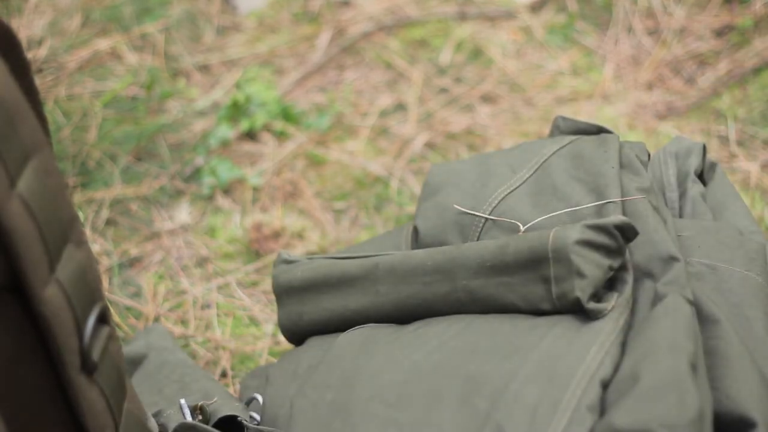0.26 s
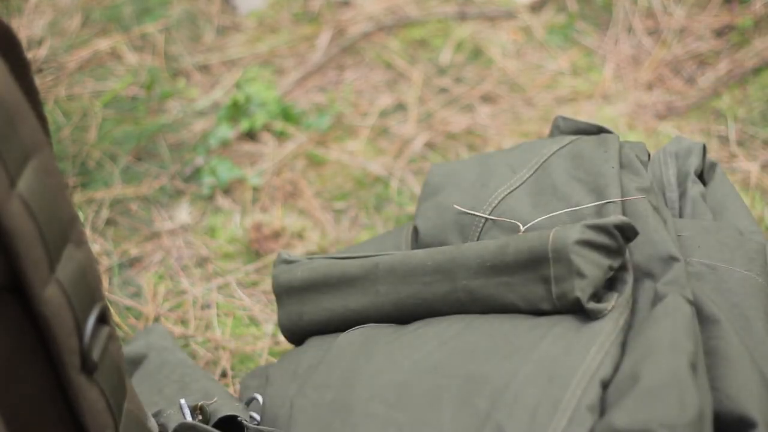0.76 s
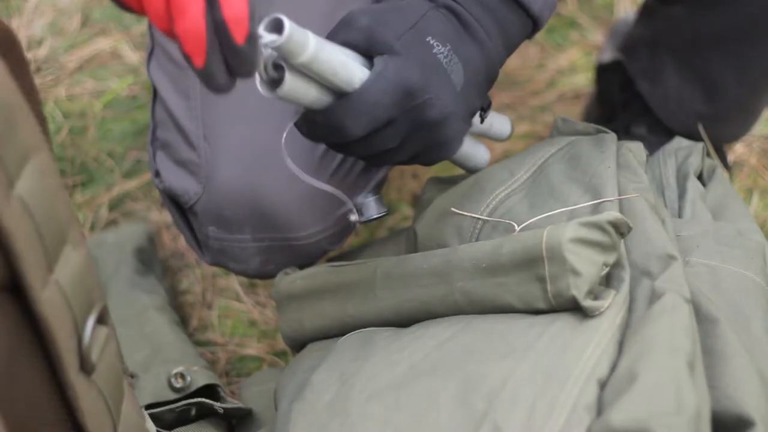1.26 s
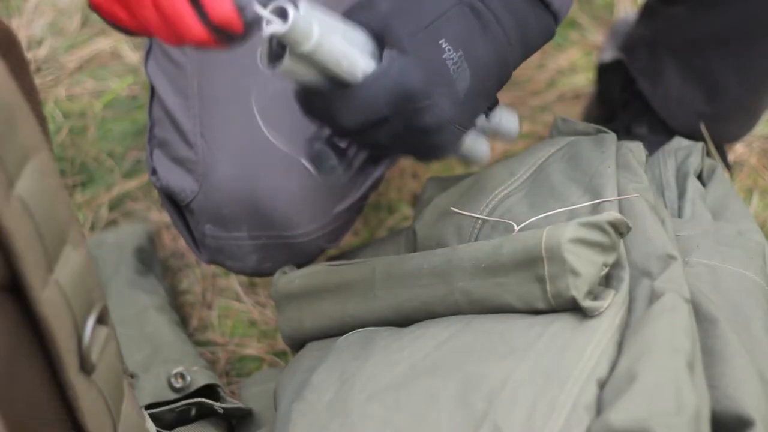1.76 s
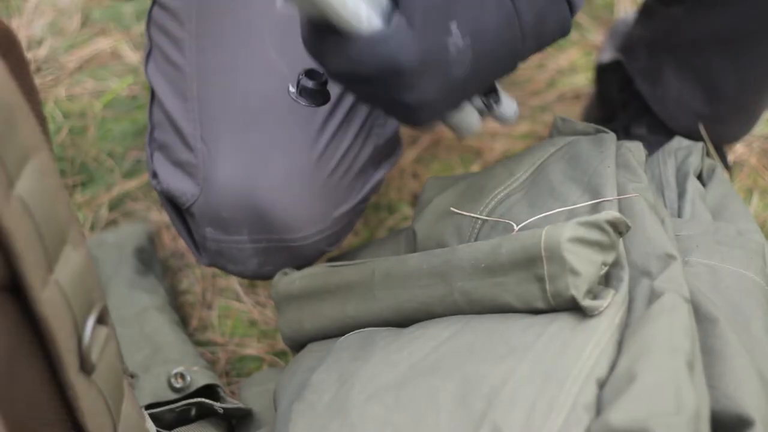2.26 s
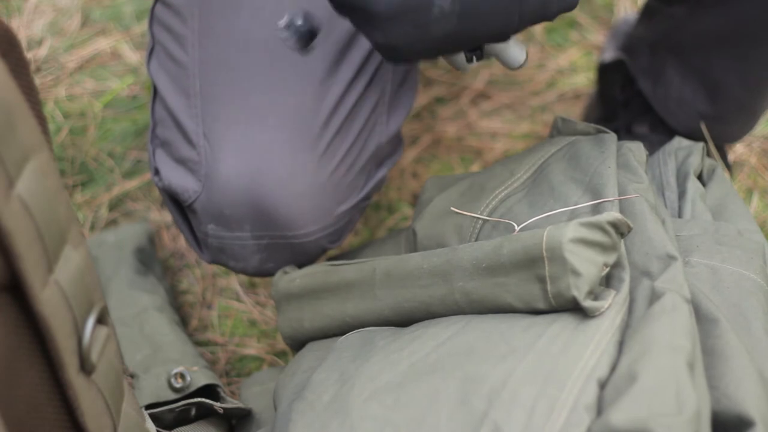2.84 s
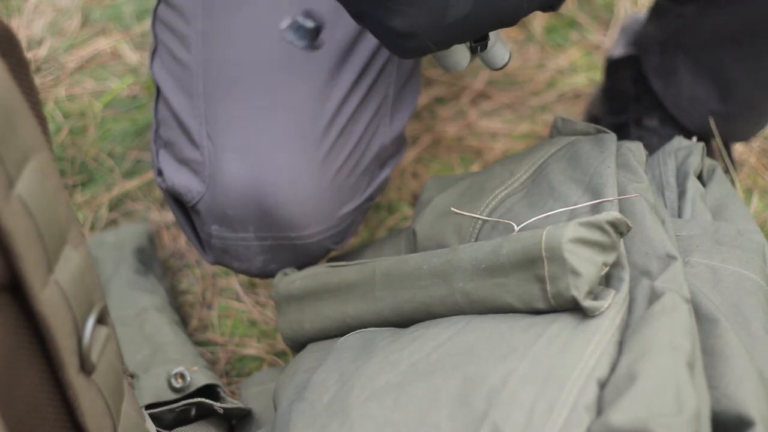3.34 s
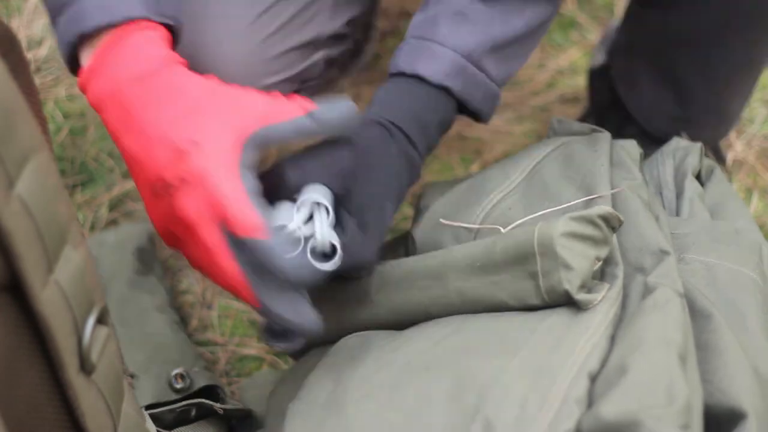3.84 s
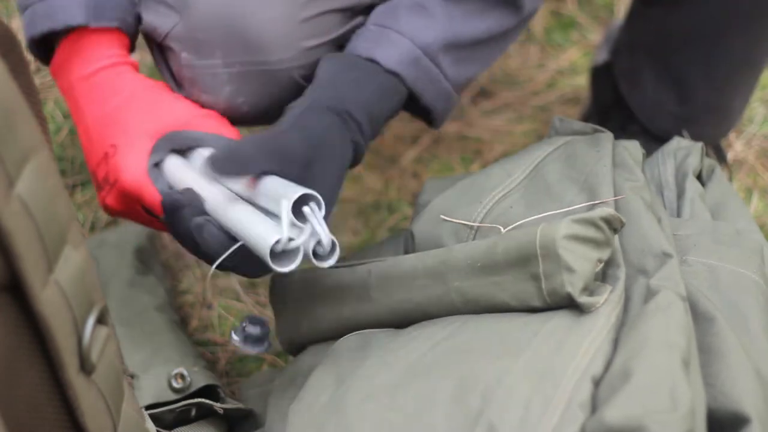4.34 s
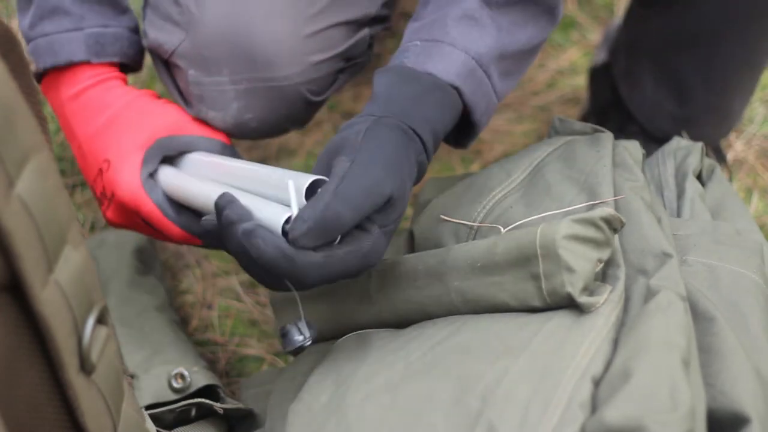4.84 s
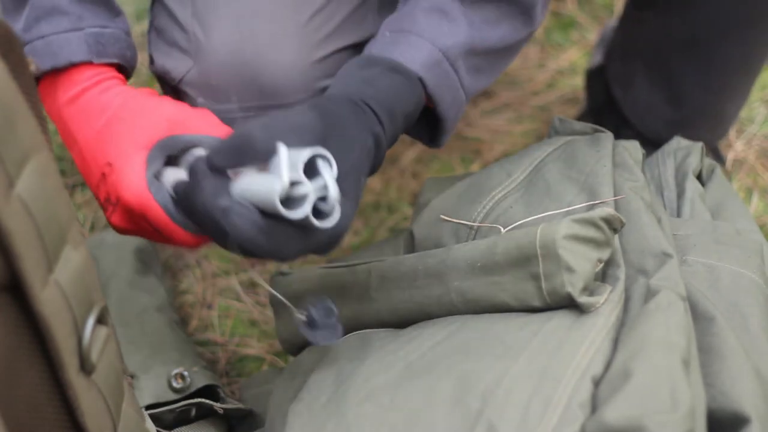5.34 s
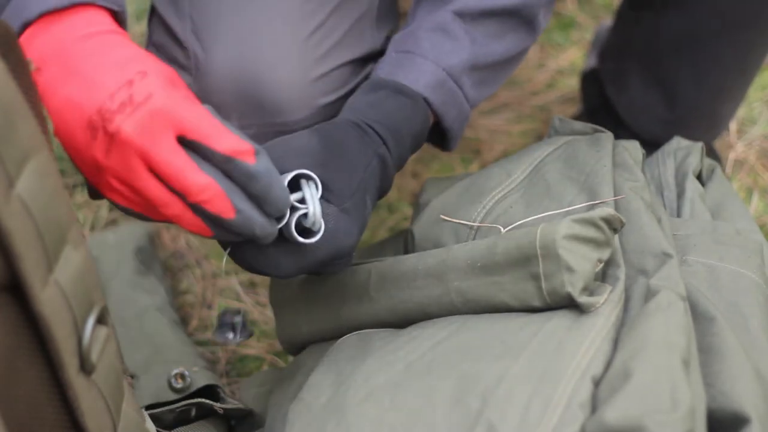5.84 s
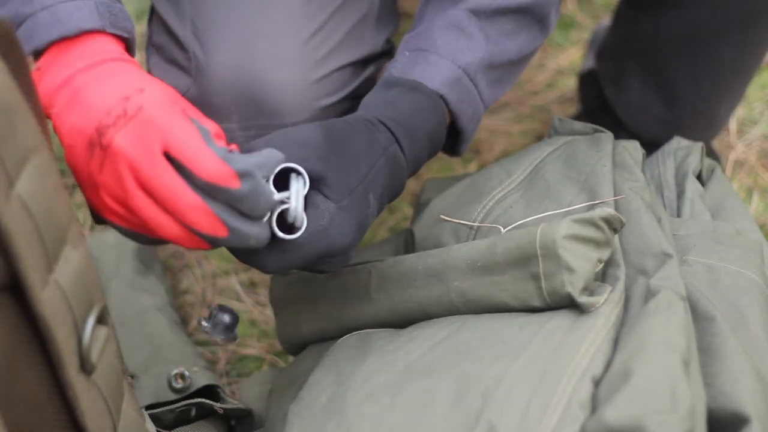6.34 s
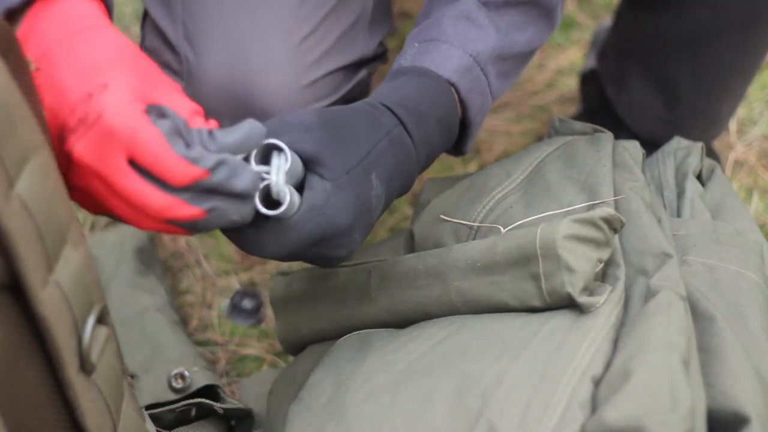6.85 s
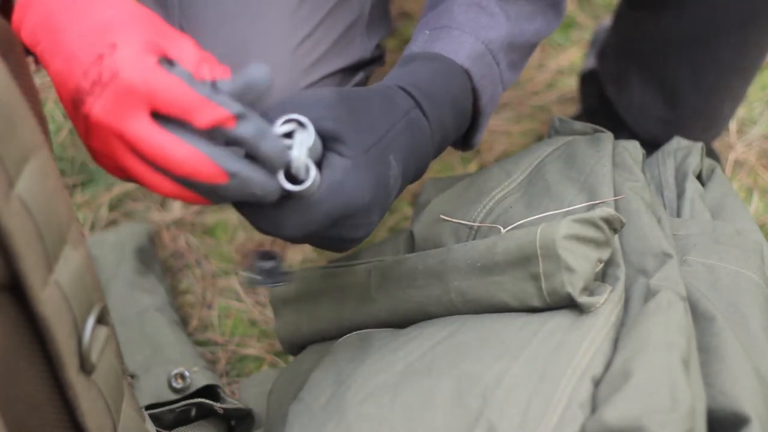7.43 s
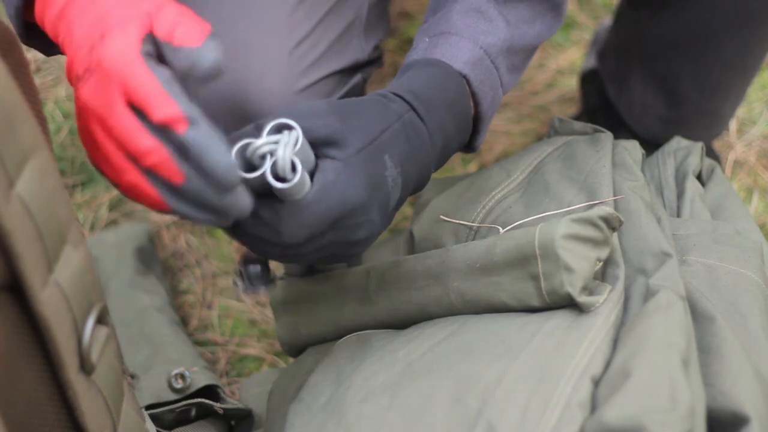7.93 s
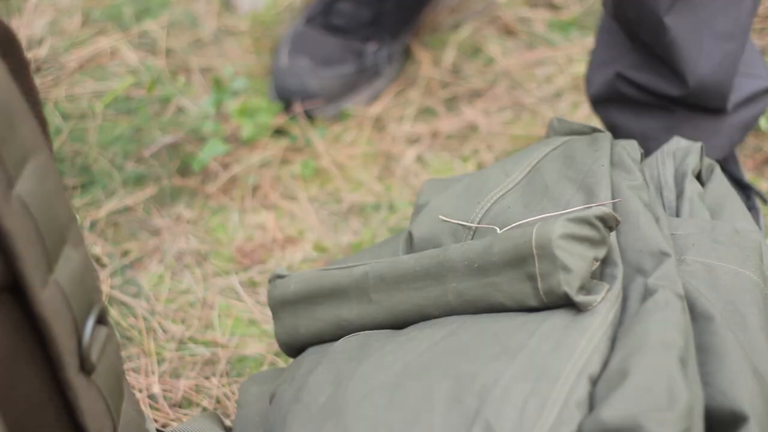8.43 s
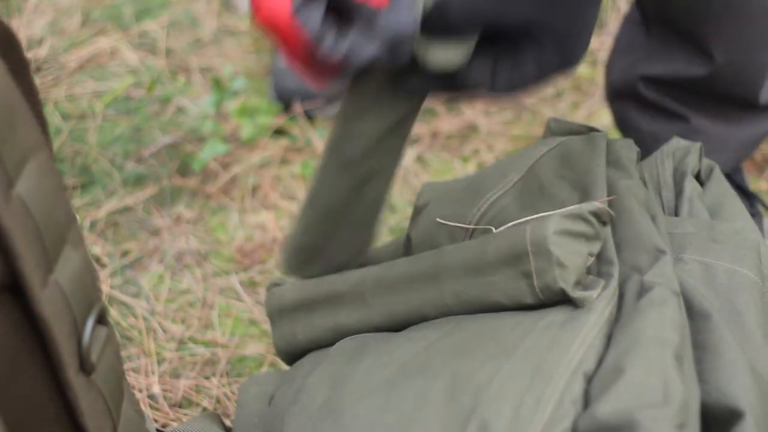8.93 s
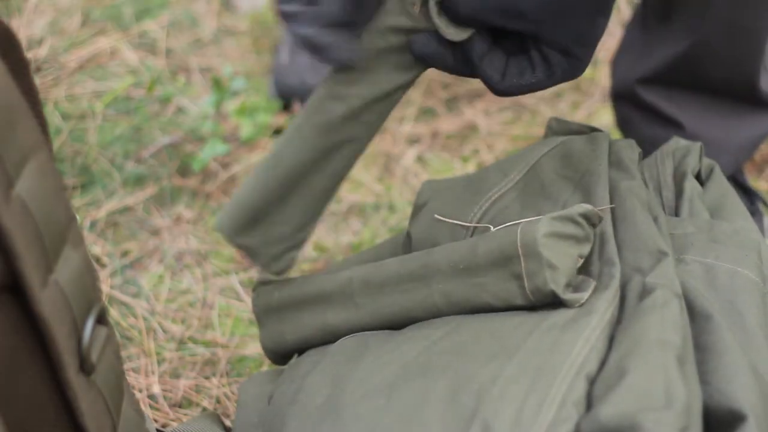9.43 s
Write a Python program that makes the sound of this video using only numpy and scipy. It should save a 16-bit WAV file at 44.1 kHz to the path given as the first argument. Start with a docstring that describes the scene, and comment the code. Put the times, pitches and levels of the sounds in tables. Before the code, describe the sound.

Close metallic clinking and short scrapes of a bundle of light hollow poles, over soft traffic wash and a few faint bird whistles, ending in fabric rustle.

```python
"""Gathering tent poles at the wood's edge

Gloved hands gather aluminium tubes over a canvas pack: noise bursts and slips excite the gripped modes.
A loose fitting clinks first and some tubes ring free, as decaying sines; a pole sleeve knocks at the end.
Canvas, road and open air are coloured noise; a bird whistles in gliding sines, and a drone and hum waver."""
import sys
import numpy as np
from scipy import signal
from scipy.fft import rfft, irfft, next_fast_len
from scipy.io import wavfile

SR = 44100
rng = np.random.default_rng(int(sys.argv[2]) if len(sys.argv) > 2 else 0)


def generate_wav(signal):
    """Clip the signal to [-1, 1] and save it as 16-bit WAV at the path in sys.argv[1]."""
    frames = np.transpose(np.atleast_2d(signal))
    scaled = np.clip(frames, -1, 1) * 32767
    pcm = np.round(scaled).astype(np.int16)
    wavfile.write(sys.argv[1], SR, pcm)


N = 427769   # length in samples

# modes of a tube free of the grip: pitch_hz [Hz], relative level_db [dB], t60_s [s]
FREE_TUBE_MODES = [(5868, -4, .21), (11140, -12, .11), (11350, -17, .14), (5216, -26, .12),
                   (6600, -23, .12), (7450, -24, .14), (8540, -24, .16), (8958, -25, .18),
                   (12950, -25, .16), (14460, -28, .18)]
# an ordinary contact: its body (near 2 kHz) and edge (above 10 kHz) leave the bundle's balance as it is
USUAL_PEAK_DB, USUAL_BODY_DB, USUAL_EDGE_DB = -12, -20, -20


def from_db(db):
    """Decibels to gain."""
    return 10 ** (np.asarray(db) / 20)


def rms_one(x):
    """Scale to unit rms."""
    return x / np.sqrt(np.mean(x ** 2) + 1e-20)


def in_time(rows):
    """Join rows (s, value) by straight lines."""
    return np.interp(np.arange(N) / SR, *np.transpose(rows))


def add(track, s, sound):
    """Mix a sound into the track at time s."""
    at = max(0, round(s * SR))
    track[at:at + len(sound)] += sound[:max(0, N - at)]


def drift(rate, count):
    """Random line through normal values of spread 1, with a new value `rate` times a second."""
    steps = np.arange(count) * rate / SR
    knots = rng.standard_normal(int(steps[-1]) + 2)
    return np.interp(steps, np.arange(len(knots)), knots)


def coloured_noise(colour):
    """Steady noise with the spectrum (Hz, dB), falling steeply below its first point; rms 1."""
    size = next_fast_len(N)
    hz, db = np.transpose(colour)
    bins = np.maximum(np.arange(size // 2 + 1) * SR / size, 1)
    low_cut = np.minimum(bins / hz[0], 1) ** 3
    gain = from_db(np.interp(np.log(bins), np.log(hz), db)) * low_cut
    return rms_one(irfft(rfft(rng.standard_normal(size)) * gain, size)[:N])


def resonate(x, hz, width):
    """One resonance with gain 1 on its top; width in Hz."""
    r = np.exp(-np.pi * width / SR)
    zeros = np.array([1, 0, -1]) * (1 - r * r) / 2
    poles = [1, -2 * r * np.cos(2 * np.pi * hz / SR), r * r]
    return signal.lfilter(zeros, poles, x)


def struck(modes):
    """A struck object: decaying sines of random sign from rows (Hz, dB, t60 s), cut off at half a second."""
    t = np.arange(SR // 2) / SR
    sound = np.zeros(len(t))
    for hz, db, t60 in modes:
        sound += from_db(db - 60 * t / t60) * np.sin(2 * np.pi * hz * t) * rng.choice([-1, 1])
    return sound


def wavering(hz, waver_hz, throb_db):
    """A far tone that drifts in pitch and level; rms 1."""
    phase = 2 * np.pi * np.cumsum(hz + waver_hz * drift(13, count=N)) / SR
    return rms_one(from_db(throb_db * drift(9, count=N)) * np.sin(phase))


def swell(t, build_s, ease_s, depth_db, fade_s):
    """Gain of one stroke of the hand: it touches, presses hardest at t = 0, eases and lets go."""
    pressure = from_db(np.interp(t, [-build_s, 0, ease_s], [-depth_db, 0, -depth_db]))
    since_touch, until_release = t + build_s + fade_s / 2, ease_s + fade_s - t
    return pressure * np.clip(np.minimum(since_touch, until_release) / fade_s, 0, 1)


def road(road_db=2.5):
    """Noise from a far road: coloured noise whose level dips at times."""
    # loudness: time_s [s], level_db before road_db is added [dB]
    loudness = [(0.0, -45.5), (0.46, -44.5), (1.92, -51), (2.05, -60), (2.32, -52), (2.54, -52),
                (3.54, -51.5), (3.94, -58), (4.78, -57.5), (6.18, -53.5), (6.48, -58), (8.4, -53),
                (8.54, -48), (9.7, -50)]
    # spectrum: pitch_hz [Hz], relative level_db [dB]
    colour = [(60, 4), (170, -11), (350, -11.5), (600, -4.5), (1000, 2), (1400, -3), (2000, -9),
              (3200, -19.5), (7000, -26.5), (16000, -41)]
    return from_db(in_time(loudness) + road_db) * coloured_noise(colour)


def drone(level_db=-49, heard_until_s=1.05, fade_s=.03):
    """A distant engine: a few low, throbbing lines, heard only for the first second."""
    # lines: pitch_hz [Hz], relative level_db [dB]
    engine_lines = [(57, -3), (62, -9.5), (82, -11), (103, -11)]
    t = np.arange(N) / SR
    lines = sum(from_db(db) * wavering(hz, waver_hz=1.5, throb_db=3.0) for hz, db in engine_lines)
    return from_db(level_db) * np.clip((heard_until_s - t) / fade_s, 0, 1) * rms_one(lines)


def open_air(level_db=-57):
    """The steady low rumble of open air, as coloured noise."""
    # spectrum: pitch_hz [Hz], relative level_db [dB]
    colour = [(25, -23), (45, -11.5), (65, -5.5), (110, -7.5), (170, -10), (350, -10), (800, -18),
              (4000, -79)]
    return from_db(level_db) * coloured_noise(colour)


def rustle(rub_db=-5, grain_db=2.0, sleeves_db=-49.5, sleeves_wander_db=-1.3):
    """Cloth rubs on cloth as grainy noise: drags of the canvas over sleeves that never quite stop."""
    # drags: fastest_s [s], build_s [s], ease_s [s], level_db before rub_db and grain [dB]
    rubs = [(.9, .25, 0.071, -38.5), (1.02, 0.053, 0.033, -37), (4.02, 0.3, 0.259, -40.5),
            (4.38, 0.24, 0.25, -39.5), (8.352, 0.0071, .34, -37), (9.03, .33, .13, -33),
            (9.3, 0.13, 0.73, -47.5)]
    # spectrum: pitch_hz [Hz], relative level_db [dB]
    colour = [(85, 8), (170, -5.5), (400, -2), (1500, -2.5), (4500, -3.5), (6500, -6), (9000, -8.5),
              (12000, -12.5), (16000, -21.5)]
    now = np.arange(N) / SR
    drags = np.zeros(N)
    for s, build_s, ease_s, db in rubs:
        drags += from_db(db) * swell(now - s, build_s, ease_s, depth_db=8, fade_s=0.024)
    sleeves = from_db(sleeves_db + sleeves_wander_db * drift(4, count=N))
    grain = from_db(rub_db + grain_db * drift(180, count=N))   # rub_db lowers all the rubbing
    return np.hypot(drags, sleeves) * grain * coloured_noise(colour)


def bundle(force, body_db, edge_db, scatter_db, detune, damping):
    """The gripped tubes answer a force; heavy contact brings out the modes near 2 kHz, a sharp rim the high ones."""
    # resonances: pitch_hz [Hz], width_hz before damping scales it [Hz], relative level_db [dB]
    resonances = [(350, 73, -15.5), (925, 1340, -16), (1630, 470, -2.5), (2180, 610, -3.5), (2875, 470, -3),
                  (3183, 670, -4), (4010, 1120, -3.5), (4680, 440, 0.5), (5213, 226, 4.5), (5440, 600, -2),
                  (6054, 345, 6.5), (6494, 390, 4.5), (7070, 180, 6), (7383, 173, 5.5), (7970, 370, 0.5),
                  (8340, 330, -0.5), (8760, 147, 4.5), (9140, 135, 4), (9520, 430, -2.5),
                  (10650, 490, -2.5), (11100, 340, -2), (11560, 710, -8.5), (12640, 350, -5.5),
                  (13500, 420, -11.5), (14600, 280, -8)]
    hz, width, db = np.transpose(resonances)
    tilt_db = np.interp(hz, [300, 1600, 2300, 4600, 8500, 11000], [0, body_db, body_db, 0, 0, edge_db])
    db = db + tilt_db + scatter_db * rng.standard_normal(len(hz))
    hz = hz * (1 + detune * rng.standard_normal(len(hz)))   # the grip shifts each mode a little
    sound = np.zeros(len(force))
    for k in range(len(hz)):
        sound += (-1) ** k * from_db(db[k]) * resonate(force, hz[k], damping * width[k])
    return sound


def chatter_t60(peak_db, body_db, usual_s=0.037, heavier_is_longer=0.19, harder_is_shorter=0.32):
    """Chatter time grows with a power of the contact's body and falls with a power of its force."""
    longer_db = heavier_is_longer * (body_db - USUAL_BODY_DB)
    shorter_db = harder_is_shorter * (peak_db - USUAL_PEAK_DB)
    return usual_s * from_db(longer_db - shorter_db)


def clacks(contacts, crack=5.3, rise_s=0.000072, favoured=0.55, favoured_width_hz=150,
           tail_db=-27, tail_t60=0.062, scuff_db=-20, scuff_s=0.0092,
           rebound_s=.01, rebound_spread=.4, rebound_db=-21.5, crest_db=11):
    """Each contact is a brief scuff as the walls meet, a crack, short chatter with a tail and a weak rebound."""
    out, lead = np.zeros(N), SR // 25   # 40 ms of scuff before the crack
    t = np.arange(-lead, SR // 8) / SR
    after = np.maximum(t, 0)
    head = slice(lead, lead + 6 * SR // 1000)   # levels are set over the first 6 ms
    scuff = from_db(scuff_db) * np.exp(-np.abs(t) / scuff_s) * (t < 0)
    for s, peak_db, body_db, edge_db, hz in contacts:
        decay = from_db(-60 * after / chatter_t60(peak_db, body_db))
        tail = from_db(tail_db - 60 * after / tail_t60)
        chatter = (decay + tail) * (1 - np.exp(-after / rise_s))
        # the far end of the tube lands just after the near end
        delay_s = rebound_s * (1 + rebound_spread * rng.uniform(-1, 1))
        rebound = from_db(rebound_db) * np.interp(t - delay_s, t, chatter)
        force = rng.standard_normal(len(t)) * (scuff + np.hypot(chatter, rebound))
        force[lead] += crack
        walls = bundle(force, body_db - USUAL_BODY_DB, edge_db - USUAL_EDGE_DB,
                       scatter_db=3.5, detune=0.021, damping=0.96)
        spot = resonate(force, hz, favoured_width_hz)   # the touched spot favours one mode
        clack = walls / np.std(walls[head]) + favoured * spot / np.std(spot[head])
        # the nominal peak stands crest_db above the level of the head
        add(out, s + t[0], from_db(peak_db - crest_db) * clack / np.std(clack[head]))
    return out


def fitting(struck_s=.2305):
    """A loose metal fitting gives one bright clink whose close modes beat."""
    # modes: pitch_hz [Hz], level_db [dB], t60_s [s]
    fitting_modes = [(1200, -27, 0.058), (1790, -44, .05), (2300, -27, 0.037), (2690, -16.5, 0.042),
                     (3820, -18, 0.025), (4580, -15.5, 0.018), (4900, -38, .12), (5330, -29, 0.099),
                     (5760, -25, 0.25), (6000, -34, 0.31), (6072, -36, 0.3), (6220, -29, 0.27),
                     (7020, -31, 0.066)]
    out = np.zeros(N)
    add(out, struck_s, struck(fitting_modes))
    return out


def sympathy(poles, level_db=-1):
    """All handling keeps the free modes faintly singing, their level differences halved in dB."""
    sound = np.zeros(N)
    for hz, db, t60 in FREE_TUBE_MODES:
        width_hz = np.log(1000) / np.pi / t60
        sound += from_db(level_db + db / 2) * resonate(poles, hz, width_hz)
    return sound


def woodland(x, level_db=-29, t60=0.72):
    """Trunks and ground scatter back a faint tail: decaying noise convolved with the metal."""
    t = np.arange(SR // 2) / SR
    echoes = rng.standard_normal(len(t)) * from_db(-60 * t / t60) * (t > .008)
    return from_db(level_db) * signal.fftconvolve(x, echoes / np.linalg.norm(echoes))[:N]


def ticks(start_s=0.91, end_s=8.33, per_s=1.6, peak_db=-32, spread_db=8, tick_hz=6750):
    """Light chance contacts while the bundle is handled, as rows for clacks()."""
    chance = rng.random((int(per_s * (end_s - start_s)), 2))
    rows = []
    for when, size in chance:
        tick_db = peak_db + spread_db * (2 * size - 1)
        rows.append((start_s + when * (end_s - start_s), tick_db, USUAL_BODY_DB, USUAL_EDGE_DB, tick_hz))
    return rows


def bird(to_hz=4270, bend=1.6, flutter_db=3.5):
    """A near-sine whistle that climbs ever faster and flutters on its way through the trees."""
    # whistles: start_s [s], level_db before flutter [dB], length_s [s], starting pitch_hz [Hz]
    whistles = [(1.038, -51, .052, 3600), (2.09, -56, 0.15, 3000), (3.57, -52, 0.15, 2950),
                (5.313, -51, .11, 3000), (6.5, -50, 0.14, 3000)]
    out = np.zeros(N)
    for s, db, length_s, from_hz in whistles:
        u = np.linspace(0, 1, int(length_s * SR))
        hz = from_hz + (to_hz - from_hz) * u ** bend + 25 * drift(380, count=len(u))
        flutter = from_db(db + flutter_db * drift(96, count=len(u)))
        level = flutter * np.sqrt(np.abs(np.sin(np.pi * u)))
        add(out, s, level * np.sin(2 * np.pi * np.cumsum(hz) / SR))
    return out


def scrapes(swell_db=11, slips_per_s=2300, hiss=0.57, rough_db=3.0, fade_s=.012,
            hardest_share=0.41, edge_db=-2.5, singing_below_db=-25, sing_per_db=0.45):
    """Sliding walls catch and slip thousands of times a second; the pressure swells and eases."""
    # one tube pushed along another: start_s [s], length_s [s], level_db [dB], body_db near 2 kHz [dB]
    slides = [(1.15, 0.05, -48, -5), (1.294, 0.046, -44, -5), (1.572, 0.09, -34.5, -1),
              (1.803, 0.09, -22, 1), (1.919, 0.14, -22, 1), (2.418, 0.098, -21, 2),
              (2.558, 0.13, -26.5, 3.5), (2.755, 0.06, -20.5, 4.5), (2.846, 0.053, -27.5, 5),
              (3.087, 0.068, -26, 4), (3.165, 0.082, -30.5, 11.5), (3.24, 0.34, -30.5, 0.5),
              (3.719, .045, -35.5, 7.5), (4.299, 0.14, -28.5, 8), (4.937, 0.11, -41.5, 5.5),
              (5.186, 0.092, -38, 2), (5.368, 0.068, -34.5, 13), (5.467, 0.054, -24.5, 5),
              (5.672, 0.097, -28.5, 8), (5.722, 0.027, -18.5, -4.5), (5.868, .025, -27, 5),
              (6.169, 0.18, -34, 8), (6.364, 0.069, -35, 8), (6.627, 0.068, -26, 6.5),
              (7.087, .16, -28.5, 8), (7.323, 0.083, -36, 5.5), (7.456, 0.021, -19, 4.5),
              (7.485, 0.1, -35.5, 11), (7.622, 0.049, -33.5, 6), (7.744, .07, -42, 3),
              (7.973, 0.042, -35, -2), (8.027, 0.056, -41, 3), (8.147, 0.076, -30, 3),
              (8.232, 0.086, -33, -1.5)]
    out = np.zeros(N)
    for s, length_s, db, body_db in slides:
        build_s, ease_s = hardest_share * length_s, (1 - hardest_share) * length_s
        t = np.arange(-build_s - fade_s / 2, ease_s + fade_s, 1 / SR)
        slips = (rng.random(len(t)) < slips_per_s / SR) * rng.standard_normal(len(t))
        rubbing = rms_one(slips) + hiss * rng.standard_normal(len(t))
        force = rubbing * from_db(rough_db * drift(209.4, count=len(t)))
        held = rms_one(bundle(force, body_db, edge_db, scatter_db=1.0, detune=.006, damping=1.0))
        # the lighter the touch, the less the sliding tube is damped and the more its wall modes sing
        singing = rms_one(bundle(force, body_db - 3.5, edge_db, scatter_db=3.0, detune=0.0062, damping=0.31))
        loose = from_db(sing_per_db * (singing_below_db - db)) * singing
        stroke = from_db(db) * swell(t, build_s, ease_s, swell_db, fade_s)
        add(out, s + build_s + t[0], stroke * rms_one(held + loose))
    return out


def free_rings():
    """A tube that the glove does not hold rings on; a blow on the rim favours the pair of modes near 11 kHz."""
    # rings: start_s [s], level_db added to every mode [dB], bright_db added near 11 kHz [dB]
    rings = [(1.424, -38, -2), (1.972, -31, 3), (2.489, -26, 7), (3.094, -21.5, -11), (3.3756, -11, -3.5),
             (3.835, -45, 19), (4.421, -38, 19), (6.65, -43, 12), (7.053, -46, 19), (7.229, -44, 15),
             (7.35, -30, 9)]
    out = np.zeros(N)
    for s, db, bright_db in rings:
        modes = []
        for hz, mode_db, t60 in FREE_TUBE_MODES:
            rim_db = np.interp(hz, [6000, 11200, 13500], [0, bright_db, 0])
            modes.append((hz, db + mode_db + rim_db, t60))
        add(out, s, struck(modes))
    return out


def thuds(rise_s=0.0015):
    """Soft thuds of knee, boot and pack: decaying bursts of dull noise."""
    # thuds: start_s [s], level_db [dB], t60_s [s]
    thud_rows = [(1.969, -23.5, 0.029), (3.805, -36.5, 0.081), (3.835, -33.5, 0.063), (4.234, -38, .06),
                 (7.46, -40.5, 0.2), (8.77, -42, 0.81), (8.973, -30.5, 0.11)]
    # spectrum: pitch_hz [Hz], relative level_db [dB]
    colour = [(40, -15), (100, -16), (300, -5.5), (600, -7), (1000, -2), (2000, -17), (16000, -59)]
    push, t = np.zeros(N), np.arange(SR // 2) / SR
    for s, db, t60 in thud_rows:
        add(push, s, from_db(db - 60 * t / t60) * (1 - np.exp(-t / rise_s)))
    return push * coloured_noise(colour)


def hum(hz=359, peak_s=2.9, peak_db=-60.5, rise_db_per_s=49, fall_db_per_s=5.5):
    """A faint far tone that swells once and dies away."""
    t = np.arange(N) / SR
    below_peak_db = np.maximum(rise_db_per_s * (peak_s - t), fall_db_per_s * (t - peak_s))
    return from_db(peak_db - below_peak_db) * wavering(hz, waver_hz=4.0, throb_db=1.0)


def sleeve_knock(knock_s=8.9755):
    """The lifted pole sleeve knocks on the pack: short decaying modes."""
    # modes: pitch_hz [Hz], level_db [dB], t60_s [s]
    knock_modes = [(293, -33, .05), (525, -39, 0.046), (848, -37, 0.33), (1200, -19, 0.014),
                   (1836, -34, .077), (2000, -30.5, 0.1), (2650, -24, 0.023)]
    out = np.zeros(N)
    add(out, knock_s, struck(knock_modes))
    return out


def scene():
    """Poles close by, cloth under them, the outdoors behind."""
    # metal on metal: start_s [s], nominal peak_db [dB], body_db near 2 kHz and edge_db above 10 kHz
    # [dB re peak, acting against the usual contact], favoured wall mode pitch_hz [Hz]
    contacts = [(0.2299, -9, -9.5, -23, 5210), (0.7283, -22.5, -2, -27, 3740),
                (1.3426, -20, -35, -24, 6100), (1.388, -15, -28, -29, 6250), (1.424, -15.5, -30, -20, 7240),
                (1.5165, -15, -26, -25, 6300), (1.734, -21, -11, -18, 4950), (1.8369, -4, -34, -21, 6140),
                (1.9692, 0, -10.5, -12, 7200), (1.9963, -8, -23, -7, 6130), (2.0118, -5.5, -37, -11, 6200),
                (2.0383, -4, -26.5, -13, 7450), (2.454, -7, -19, -20, 7140), (2.4718, -15, -30, -14, 7270),
                (2.4882, -9, -42, -23, 6400), (2.599, -5.5, -13, -21, 5250),
                (2.6202, -10.5, -29, -19, 6330), (2.808, 0, -17.5, -19, 6340),
                (3.094, -14.5, -16, -27, 5880), (3.1698, -12.5, -10, -29, 5220),
                (3.2138, -13, -21, -16, 6180), (3.3747, -12, -31, -6, 5870), (3.6777, -8, -25, -29, 5940),
                (3.8341, -8.5, -6, -16, 6230), (3.9499, -26, -15, -18, 6270), (4.3044, -11, -22, -16, 6250),
                (4.3151, -6, -22.5, -21, 7090), (4.368, -17, -22, -15, 6390), (4.4202, -16, -20, -20, 4880),
                (4.504, -16.5, -25.5, -19, 6470), (4.5526, -27.5, -22, -24, 7600),
                (4.7208, -9, -19.5, -11, 6910), (4.7298, -16.5, -16.5, -23, 6660),
                (4.8575, -8, -25, -13.5, 6760), (4.878, -16, -18, -22, 7300), (5.091, -23.5, -6, -34, 6190),
                (5.1542, -13, -25.5, -20, 9460), (5.2976, -18, -9, -20, 7200),
                (5.3068, -15.5, -19, -11, 5750), (5.377, -5, -17.5, -22, 3130),
                (5.4071, -11, -22, -19, 9000), (5.4845, -4.5, -42, -20, 7000),
                (5.5833, -20.5, -21, -27, 7140), (5.8287, -5, -17, -20, 6350), (5.8675, -9, -15, -18, 6500),
                (5.9218, -9.5, -25, -10, 7200), (5.99, -18.5, -13.5, -20, 6900),
                (6.0285, -17.5, -17, -26, 9950), (6.0929, -20.5, -17, -27, 4100),
                (6.1143, -20, -19, -26, 8970), (6.3599, -19.5, -13, -22, 8000),
                (6.6438, -9, -21, -18.5, 5700), (6.7248, -22, -14, -23, 6550),
                (6.7795, -26.5, -21, -26, 6800), (7.0525, -18.5, -27, -22, 6760),
                (7.0993, -16.5, -18, -20, 6960), (7.1316, -7.5, -17, -7, 8350),
                (7.1498, -10.5, -29, -15, 8800), (7.1789, -8, -11, -11, 8420), (7.227, -6, -22, -18, 6890),
                (7.3312, -13.5, -22.5, -20, 6820), (7.458, -3.5, -19.5, -23, 5960),
                (7.4949, -15.5, -32, -17, 6200), (7.5468, -17, -16, -22, 6830),
                (7.883, -29.5, -13, -26, 7240), (8.1466, -15.5, -14.5, -29, 7050)]
    poles = clacks(contacts) + scrapes() + clacks(ticks())
    metal = poles + sympathy(poles) + free_rings() + fitting()
    cloth = rustle() + thuds() + sleeve_knock()
    distance = road() + drone() + hum() + open_air()
    return (metal + woodland(metal) + bird() + cloth + distance)[None]


def record(dry, cutoff_hz=15900):
    """The loudest peaks overload, then a steep low-pass cuts the top."""
    top_cut = signal.ellip(10, .1, 70, cutoff_hz, fs=SR, output="sos")
    return signal.sosfilt(top_cut, np.clip(dry, -1, 1))


dry = scene()
out = record(dry)
generate_wav(out)
```